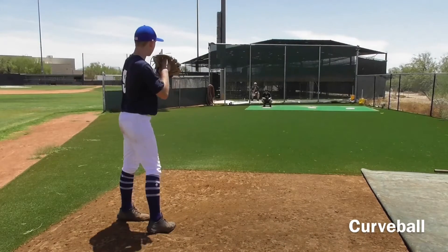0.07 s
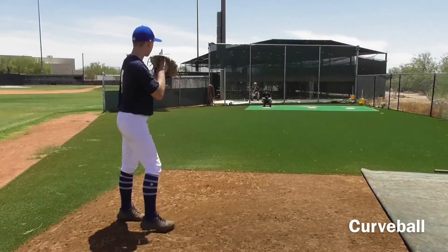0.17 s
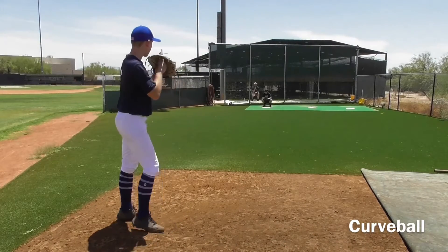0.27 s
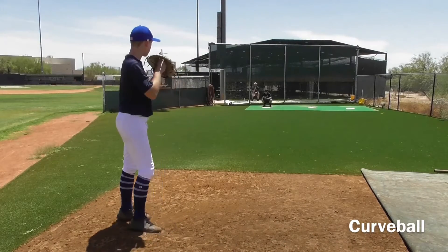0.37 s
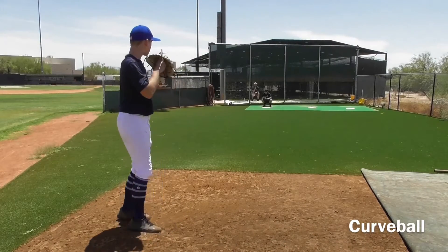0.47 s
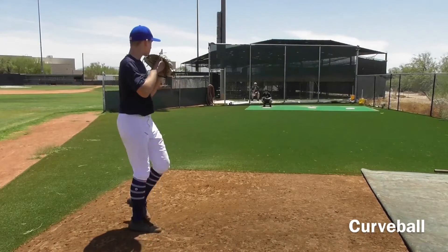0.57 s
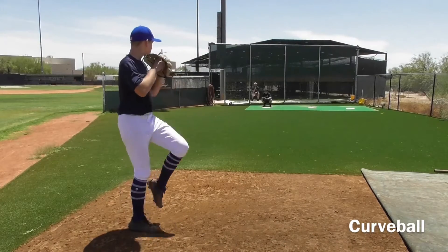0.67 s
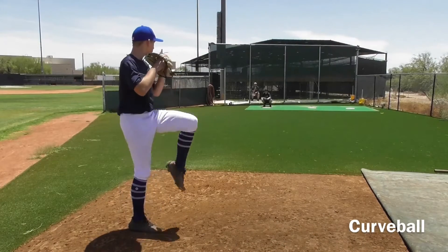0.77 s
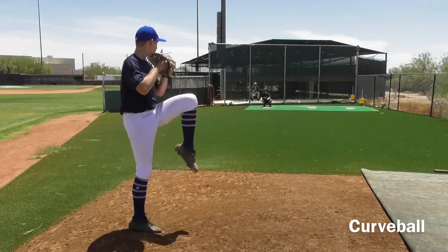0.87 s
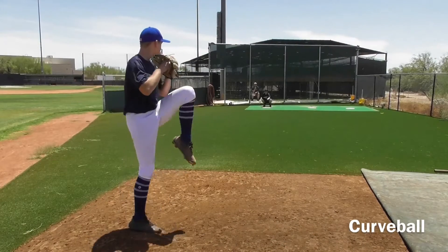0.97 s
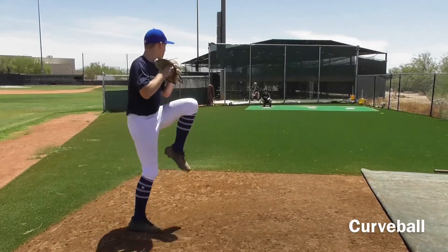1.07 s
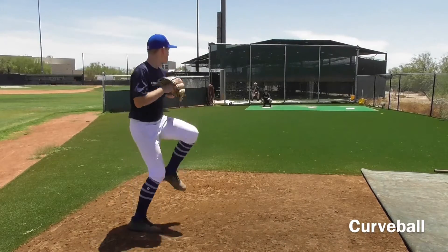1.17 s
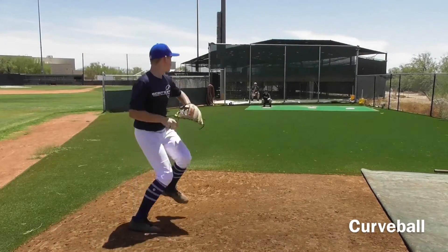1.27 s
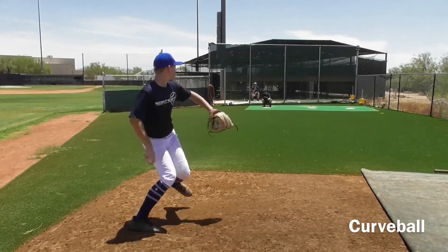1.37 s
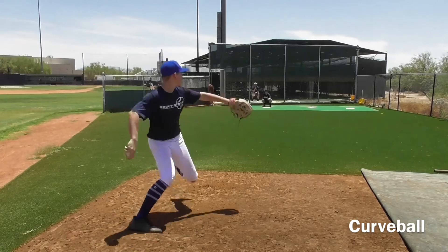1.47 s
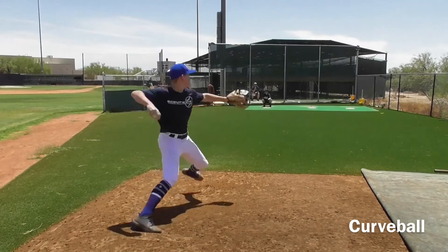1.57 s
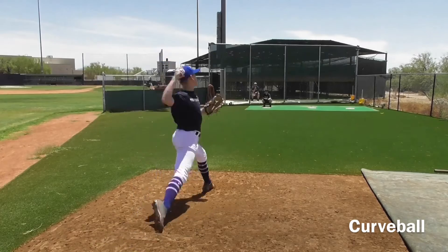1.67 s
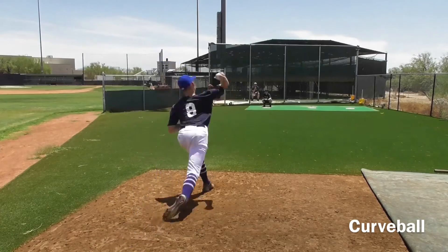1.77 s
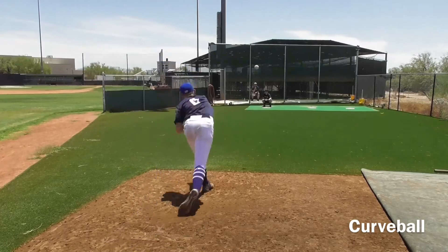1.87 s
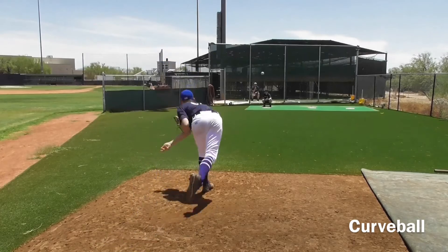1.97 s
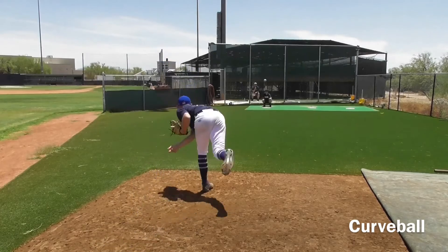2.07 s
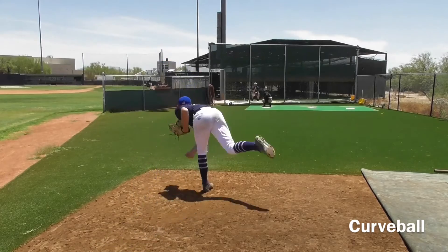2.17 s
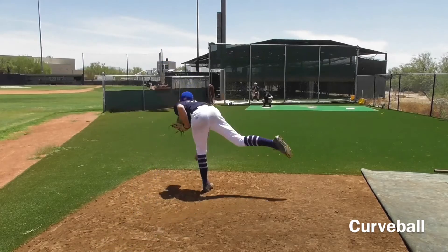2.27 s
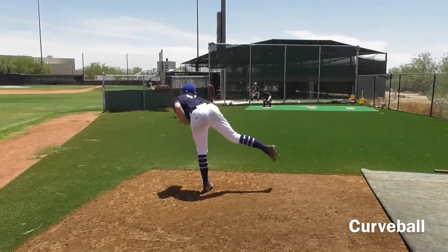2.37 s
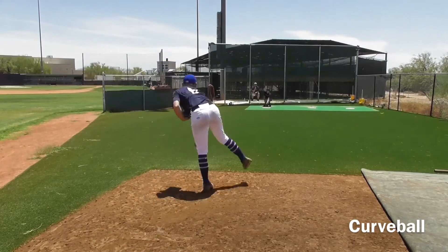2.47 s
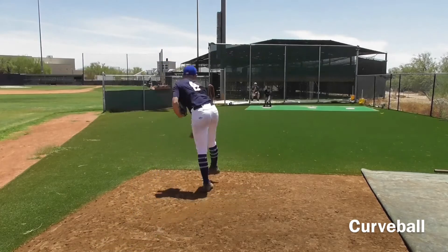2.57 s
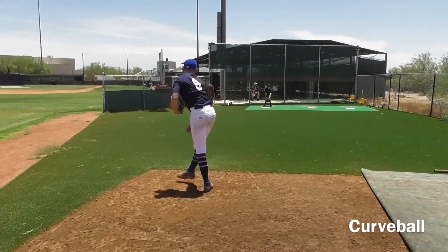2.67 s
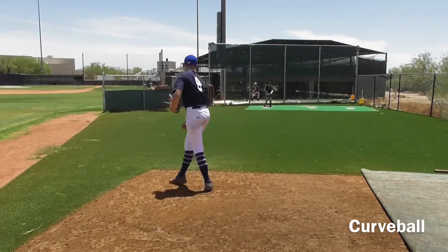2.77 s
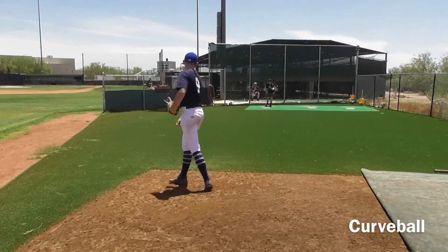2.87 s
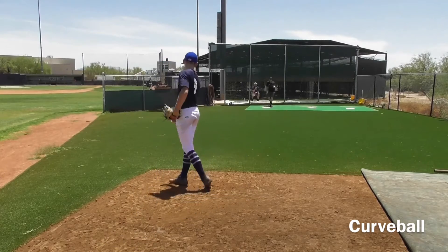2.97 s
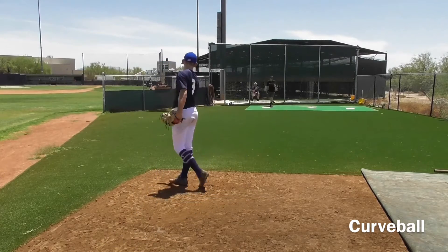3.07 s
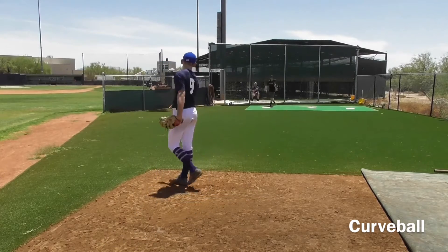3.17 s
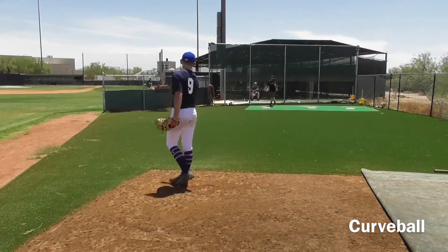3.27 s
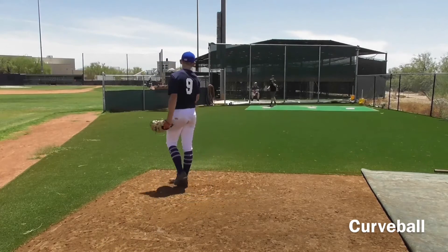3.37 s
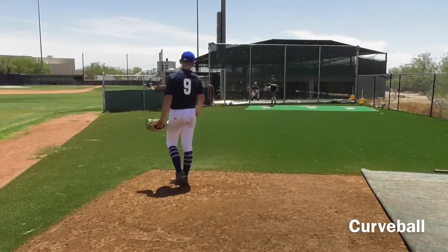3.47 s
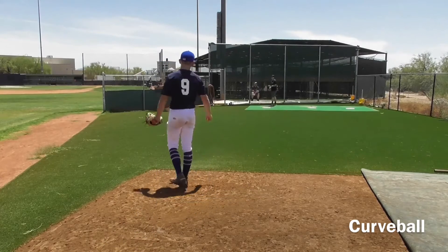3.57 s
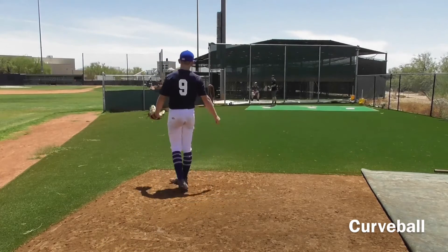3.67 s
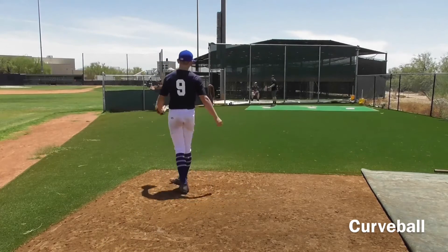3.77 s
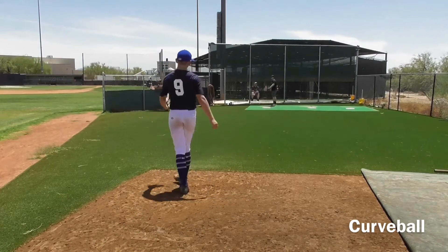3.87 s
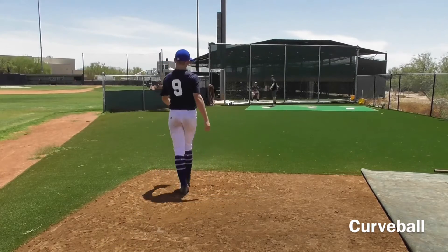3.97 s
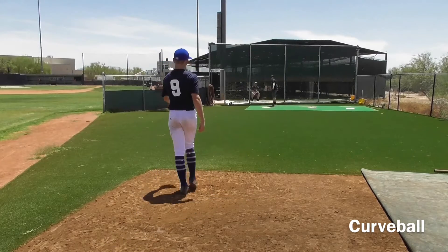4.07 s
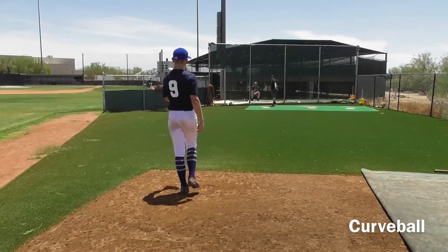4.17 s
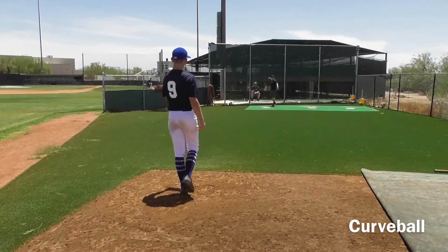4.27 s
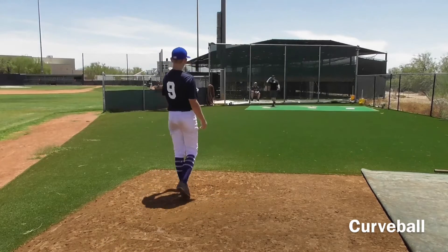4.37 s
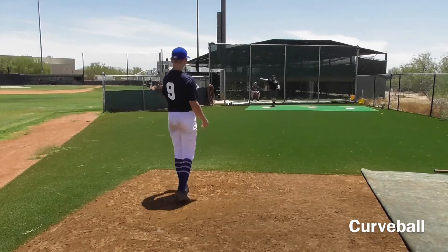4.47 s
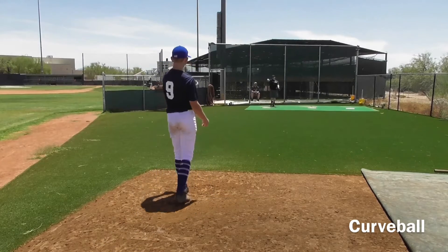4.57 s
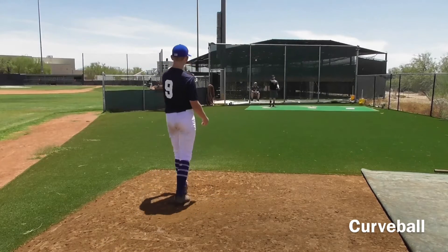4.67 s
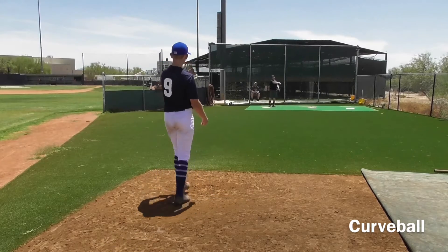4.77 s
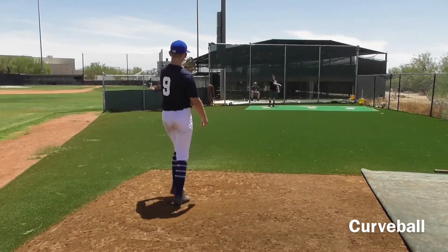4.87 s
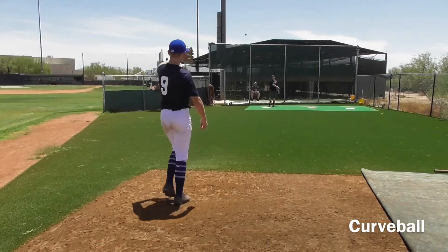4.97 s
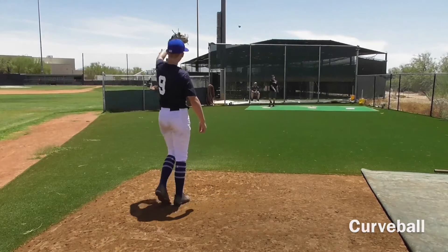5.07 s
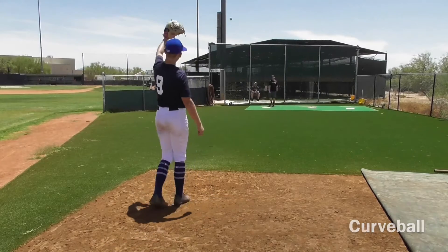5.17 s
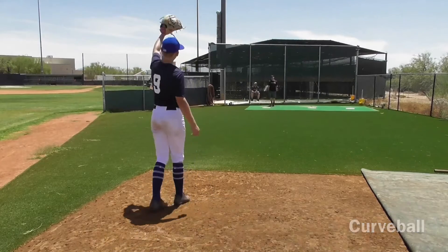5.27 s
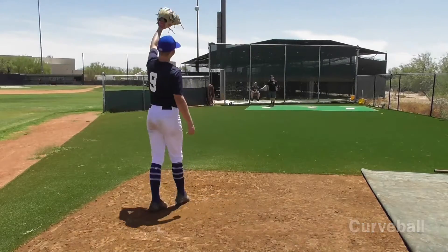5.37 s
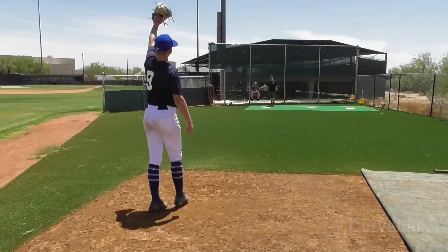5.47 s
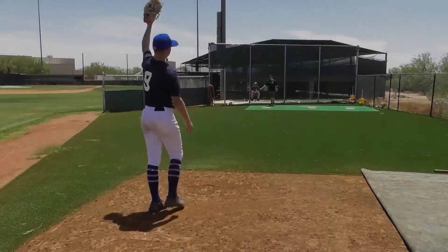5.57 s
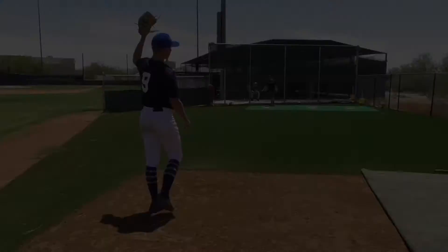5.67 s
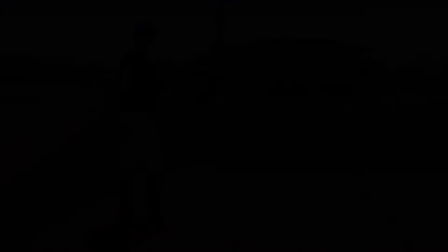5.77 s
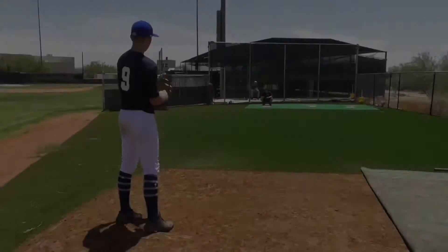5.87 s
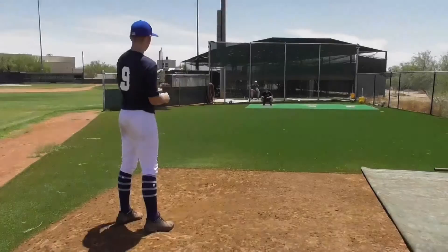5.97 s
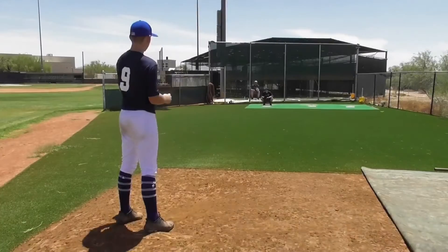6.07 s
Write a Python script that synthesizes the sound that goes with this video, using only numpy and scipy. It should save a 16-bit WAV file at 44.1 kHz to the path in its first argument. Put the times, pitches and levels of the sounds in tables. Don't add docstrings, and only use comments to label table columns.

```python
import sys
import numpy as np
from scipy import signal
from scipy.fft import rfft, irfft, next_fast_len
from scipy.io import wavfile
from scipy.ndimage import uniform_filter1d, minimum_filter1d

SR = 44100
rng = np.random.default_rng(int(sys.argv[2]) if len(sys.argv) > 2 else 0)


def attenuation_scalar(level_db):
    decades = np.asarray(level_db, float) / 20
    return 10 ** decades


def digitize_waveform(pressure):
    field = np.atleast_2d(pressure).T
    bounded = np.clip(field, -1, 1)
    quanta = np.round(bounded * 32767).astype(np.int16)
    wavfile.write(sys.argv[1], SR, quanta)


N = 269627
TIME, PADDED = np.arange(N) / SR, next_fast_len(N)
FREQ = np.maximum(np.fft.rfftfreq(PADDED, 1 / SR), 1)


def unit(x):
    return x / np.sqrt(np.mean(x ** 2))


def noise():
    return rng.standard_normal(N)


def curve(table, column):
    rows = np.array(table)
    return np.interp(TIME, rows[:, 0], rows[:, column])


def colour(table):
    rows = np.array(table)
    return attenuation_scalar(np.interp(np.log(FREQ), np.log(rows[:, 0]), rows[:, 1]))


def bell(hz, octaves):
    return np.exp(-(np.log2(FREQ / hz) / octaves) ** 2)


def shaped(x, gain):
    return irfft(rfft(x, PADDED) * gain, PADDED)[..., :N]


def band(x, hz, octaves):
    return shaped(x, bell(hz, octaves))


def walk(rate):
    hold = int(SR / rate)
    steps = np.repeat(rng.standard_normal(N // hold + 1), hold)
    return unit(uniform_filter1d(uniform_filter1d(steps, hold), hold)[:N])


def even(x, seconds):
    size = int(seconds * SR)
    return x / np.sqrt(uniform_filter1d(uniform_filter1d(x ** 2, size), size))


def pair(mid, side):
    return np.array([mid + side, mid - side])


def add(out, s, sound):
    i = int(s * SR)
    out[..., i:i + sound.shape[-1]] += sound[..., :N - i]


# (frequency [Hz], level [dB per Hz])
AIR_COLOUR = [(12, -41.5), (24, -8.5), (98, -5), (134, -9), (168, -6.5), (270, -12), (377, -13),
              (410, -17.5), (527, -21), (802, -21), (1660, -39.5), (3630, -42), (5080, -53), (8650, -43),
              (16000, -46)]
# (frequency [Hz], side minus mid [dB])
AIR_WIDTH = [(60, -7), (110, -8.5), (200, -13), (380, -11), (700, -11), (1290, -12.5), (2380, -20.5),
             (4400, -24.5), (8120, -16.5), (15000, 3.5)]
# (time [s], level [dB])
TRAFFIC = [(0, -49), (.5, -49.5), (1.05, -46.5), (1.4, -48.5), (2.3, -49), (2.8, -46), (3.4, -48.5),
           (3.92, -47.5), (4.1, -50.5), (4.7, -49), (5.2, -48.5), (5.8, -49.5)]


def field():
    mid, side = (rfft(noise(), PADDED) * colour(AIR_COLOUR) for _ in range(2))
    side = side * colour(AIR_WIDTH)
    layers, swell = np.zeros((4, 2, N)), walk(1.443)
    for hz in 22 * 2 ** np.arange(0, 9.6, .5):
        gain = bell(hz, .5)
        flicker_db = 0.59 * swell + 2.18 * min(1, (600 / hz) ** .5) * walk(9)
        layer = np.searchsorted([150, 1500, 5000], hz)
        layers[layer] += attenuation_scalar(flicker_db) * pair(irfft(mid * gain, PADDED)[:N], irfft(side * gain, PADDED)[:N])
    echo_s, echo_db, echo_ms = 2.535, -38, 42
    echo = attenuation_scalar(echo_db) * (TIME > echo_s) * np.exp(-np.abs(TIME - echo_s) * 1000 / echo_ms)
    traffic = np.hypot(attenuation_scalar(curve(TRAFFIC, 1)), echo)
    breeze = attenuation_scalar(-50.5 + 10 * np.exp(-TIME / .35))
    air = attenuation_scalar(-74.3) * (traffic / attenuation_scalar(-49)) ** .45 + echo * attenuation_scalar(-27)
    levels = [breeze, traffic, air, attenuation_scalar(-71)]
    return sum(gain * x / x.mean(axis=0).std() for gain, x in zip(levels, layers))


# (time [s], depth [dB], half length [s])
HUM_LULLS = [
    (.35, -18, .2),
    (.85, -12, .2),
    (2.59, -25, .025),
    (3.3, -18, .07),
    (4.0, -22, .1),
    (5.17, -25, .09),
]


def hum():
    level_db = -49.5 + sum(db * np.exp(-((TIME - s) / half) ** 2) for s, db, half in HUM_LULLS)
    level = np.sqrt(2) * attenuation_scalar(level_db + 1.2 * walk(14) - 1.5)
    pitch_hz = 166.7 + 2.0 * walk(5.5)
    return level * np.sin(2 * np.pi * np.cumsum(pitch_hz) / SR)


def insects():
    swell = np.exp(-((TIME - 3.2) / .17) ** 2)
    return swell * attenuation_scalar(-76 + 2.0 * walk(24.9)) * unit(band(noise(), 3550, 0.11))


# (time [s], peak level [dB], pitch [Hz], length [ms])
AIR_PUFFS = [
    (0.06, -38, 140, 20),
    (0.088, -32, 79.5, 17),
    (0.24, -31, 57.6, 9.4),
    (1.029, -40, 59.2, 13),
    (1.297, -34, 72.7, 14.0),
    (1.392, -31, 63, 17.5),
]


def puffs():
    out, ms = np.zeros((2, N)), np.arange(4096) / SR * 1000
    for s, db, hz, length in AIR_PUFFS:
        shape = np.exp(-(ms / length - 1.3) ** 2) * np.sin(2 * np.pi * hz * ms / 1000)
        add(out, s, attenuation_scalar(db) * shape * np.array([[.8], [1.2]]))
    return out


# (time [s], common level [dB], opposed minus common level [dB])
GUST_PATH = [
    (5.83, -45, 2.5),
    (5.84, -44, 2.5),
    (5.894, -25, 2),
    (5.986, -23, 2),
    (6.114, -26, 3),
]
# (frequency [Hz], level [dB per Hz])
GUST_COMMON = [(15, -49), (25, -23), (140, 0), (200, 1), (300, -1), (543, -12), (732, -17.5), (1120, -23),
               (2730, -63), (4000, -63.5), (5200, -94.5), (8800, -120)]
# (frequency [Hz], level [dB per Hz])
GUST_OPPOSED = [(15, -73), (25, -32), (118, -12.5), (155, -6.5), (341, -4), (412, -2), (985, -14.5),
                (1380, -30), (2670, -58), (4000, -69), (5200, -99), (8800, -120)]
# (time [s], peak level [dB])
GUST_BUFFETS = [(5.87, -42), (5.888, -22.5), (5.899, -34), (5.916, -36), (5.936, -31), (5.947, -24),
                (5.965, -19), (5.98, -30.5), (6.006, -28), (6.032, -30.5), (6.043, -28), (6.061, -25),
                (6.084, -30), (6.099, -31.5)]


def buffets():
    hard, slaps, ms = np.zeros(N), np.zeros(N), np.arange(2048) / SR * 1000
    swings_hz = 480 * np.exp(.15 * rng.standard_normal(len(GUST_BUFFETS)))
    for (s, db), hz in zip(GUST_BUFFETS, swings_hz):
        shape = attenuation_scalar(db) * np.exp(-(ms / 2.9 - 1.2) ** 2 * 2)
        add(hard, s, shape)
        add(slaps, s, shape * np.sin(2 * np.pi * hz * ms / 1000))
    eddies = [hard * unit(band(noise(), 870, 0.72)) for _ in range(2)]
    return pair(.35 * slaps + attenuation_scalar(-15) * eddies[0], attenuation_scalar(6.5) * slaps + attenuation_scalar(-4) * eddies[1])


def gust():
    flutter, dull = attenuation_scalar(1.1 * walk(70)), 1 / (1 + (FREQ / 1500) ** 2)
    mid, side = (even(shaped(flutter * noise(), colour(table) * dull), 0.015)
                 for table in (GUST_COMMON, GUST_OPPOSED))
    start = np.clip((TIME - GUST_PATH[0][0]) / 0.0025, 0, 1)
    strength_db = curve(GUST_PATH, 1)
    wind = start * attenuation_scalar(strength_db) * pair(mid, attenuation_scalar(curve(GUST_PATH, 2)) * side)
    edge = shaped(wind, 1 / (1 + (650 / FREQ) ** 4))
    wind = wind + edge * (attenuation_scalar(.5 * (strength_db + 25)) - 1)
    return (wind + buffets()) * attenuation_scalar([[-.7], [.7]])


# (time of hardest pressure [s], grit level [dB], lean-in [ms], let-go [ms],
# drag minus grit [dB])
CLEAT_SLIDES = [(1.19, -69, 45, 110, 12), (1.566, -72, 140, 60, 3.5), (1.695, -56, 16, 28, 6),
                (1.738, -46, 10, 12, 3.5), (1.757, -50, 12, 3.5, 2.5), (1.79, -65, 25, 40, 5),
                (1.843, -54, 8, 34, 5.5), (1.915, -68, 30, 170, 7), (2.262, -68, 35, 35, -5),
                (2.35, -75, 60, 90, -2), (3.67, -76, 70, 90, 4), (5.2, -74, 80, 120, 6),
                (5.618, -70, 60, 70, 3.5)]


def dirt():
    grains = noise() * attenuation_scalar(3.04 * rng.exponential(size=N)) * attenuation_scalar(2.4 * walk(200))
    grit = unit(band(grains, 8000, 0.62))
    scrape = unit(band(grains, 2620, 0.79))
    drag = unit(band(grains, 630, 0.84))
    out = np.zeros(N)
    for s, db, lean, let_go, drag_db in CLEAT_SLIDES:
        pressure = np.exp(-np.abs(TIME - s) * 1000 / np.where(TIME < s, lean, let_go))
        scrape_db = -3 - .25 * (db + 60)
        out += attenuation_scalar(db) * pressure * (grit + attenuation_scalar(scrape_db) * scrape + attenuation_scalar(drag_db) * drag)
    return out


# (time [s], peak level [dB], treble minus middle [dB])
LEATHER_CRACKS = [(2.5133, -40, -1), (2.5182, -32.5, -9), (2.526, -28.5, -4), (2.531, -38, -9),
                  (2.5368, -34.5, -8), (2.5424, -44, -7), (2.566, -50, -6), (2.5774, -48, -9),
                  (5.5007, -19, -10.5), (5.5052, -14.5, -11.5), (5.5204, -46, 4)]
# (time [s], peak level [dB], body minus middle [dB], treble minus middle [dB])
DIRT_TICKS = [(0.1615, -52, -3, -15), (0.3267, -47, 12, -8), (0.5232, -55.5, 4, -13), (0.5826, -52, 0, -10),
              (0.6166, -50, -2, -13), (0.9194, -50, -10, -9), (1.1842, -37.5, 0, -2), (1.7484, -45, 8, -1),
              (1.757, -48, 7, 3), (1.8390, -41.5, 6, 4), (1.8541, -45, 0.5, 7), (1.8735, -42.5, 4, -7),
              (2.2227, -53, 6, 2), (2.7734, -46, 14, -9), (3.6496, -52.5, 5, -5), (4.5865, -53, -2, 1),
              (5.16, -52, 7, -4), (5.6555, -46, 0, -9)]


def snaps():
    body, middle, treble = (unit(band(noise(), hz, octaves))
                            for hz, octaves in [(750, 0.89), (2900, 0.8), (8600, .5)])
    low, mid, high = np.zeros((3, N))
    ms = np.arange(8192) / SR * 1000
    tail = attenuation_scalar(-24.5) * np.exp(-ms / 32.5)
    crack = np.minimum(ms / 0.36, 1) * np.exp(-ms / 3.4)
    bright_crack = crack + attenuation_scalar(-7.5) * tail
    for s, db, treble_db in LEATHER_CRACKS:
        add(low, s, attenuation_scalar(db - 3.5) * (0.14 * crack + tail))
        add(mid, s, attenuation_scalar(db - 12.5) * bright_crack)
        add(high, s, attenuation_scalar(db + treble_db - 10.5) * bright_crack)
    tick = np.minimum(ms / 1.1, 1) * np.exp(-ms / 3.2)
    for s, db, body_db, treble_db in DIRT_TICKS:
        add(low, s, attenuation_scalar(db + body_db - 5) * tick)
        add(mid, s, attenuation_scalar(db - 9) * tick)
        add(high, s, attenuation_scalar(db + treble_db - 7.5) * tick)
    return low * body + mid * middle + high * treble


# (time [s], peak level [dB], pocket pitch [Hz], ring [cycles])
MITT_BLOWS = [
    (2.5125, -23, 300, 1.0),
    (2.518, -16, 640, .45),
    (2.5208, -18, 420, .7),
    (2.5280, -5, 420, .4),
    (2.5268, -18, 285, 1.1),
    (2.5265, -30, 1250, 1.8),
    (2.535, -25, 430, 2.6),
]
# (time [s], peak level [dB], pocket pitch [Hz], ring [cycles])
GLOVE_BLOWS = [
    (5.5027, -19, 700, 1.5),
    (5.5062, -13.5, 1130, 2.2),
    (5.5061, -26, 3600, 3.2),
    (5.5067, -7.2, 470, 1.1),
    (5.5072, -19, 300, 1.5),
    (5.5124, -11, 406, 1.1),
    (5.5182, -16, 380, .6),
]
# (time [s], peak level [dB], hollow pitch [Hz], ring [cycles])
HEEL_KNOCKS = [
    (.592, -32, 550, 1.3),
    (1.1845, -44, 2110, 4.8),
    (1.19, -36, 400, 1.5),
    (1.688, -27.5, 640, 1.2),
    (1.69, -36, 300, 2.5),
    (2.7745, -50, 2260, 8),
]


def leather():
    out, t = np.zeros(N), np.arange(2048) / SR
    for rows, squeeze in [(MITT_BLOWS, 1.03), (GLOVE_BLOWS, .38), (HEEL_KNOCKS, .45)]:
        for s, db, hz, ring in rows:
            cycles = hz * t
            push = np.minimum(cycles / squeeze, 1) ** 2
            decay = np.exp(-np.maximum(cycles - squeeze, 0) / ring)
            add(out, s, attenuation_scalar(db) * push * decay * np.sin(2 * np.pi * cycles))
    return signal.sosfiltfilt(signal.butter(2, 100, "high", fs=SR, output="sos"), out)


def fade():
    change_s, fall_ms, rise_ms = 5.832, 27, 28
    away = np.abs(TIME - change_s) * 1000 / np.where(TIME < change_s, fall_ms, rise_ms)
    return attenuation_scalar(-23 * np.maximum(1 - away, 0))


# (time [s], left minus right level [dB])
PAN = [
    (0, .5),
    (1.5, 1),
    (2.4, -0.5),
    (2.7, 1.5),
    (5.4, 1.5),
    (6.1, 9),
]


def scene():
    near = leather() + snaps() + dirt()
    wide = attenuation_scalar(-15.5) * band(np.roll(near, 12), 1200, 1.7)
    wide += attenuation_scalar(-18) * band(np.roll(near, 40), 7700, 1.5)
    pan_db = curve(PAN, 1) * np.array([[.5], [-.5]])
    background = field() + hum() + puffs() + insects()
    return (pair(near, wide) * attenuation_scalar(pan_db) + background) * fade() + gust()


def starve(x):
    z = signal.stft(np.pad(x, ((0, 0), (0, 4096)), "reflect"), nperseg=1024)[2]
    power = (np.abs(z) ** 2).mean(axis=0)
    total = minimum_filter1d(power.sum(axis=0), size=5)
    blocks = uniform_filter1d(power[:-1].reshape(64, 8, -1).sum(axis=1), size=3, axis=1)
    scatter = 2 * uniform_filter1d(rng.standard_normal(blocks.shape), size=4, axis=1)
    top = np.clip(np.linspace(-2, 2.4, 64), 0, 1)[:, None]
    need_db = -67 + 8 * top + 3.2 * scatter
    z[:, :-1] *= np.repeat(blocks > total * attenuation_scalar(2 * need_db), 8, axis=0)
    return signal.istft(z, nperseg=1024)[1][:, :N]


# (frequency [Hz], width [octaves], level [dB])
HOUSING_MODES = [
    (2020, 0.14, 3.5),
    (2895, 0.2, -4),
    (3850, 0.1, 0.5),
    (5040, 0.11, -4),
    (8090, .13, 3),
]


def housing(x):
    colour_db = sum(db * bell(hz, octaves) for hz, octaves, db in HOUSING_MODES)
    return shaped(x, attenuation_scalar(colour_db) * (FREQ < 15780))


def roll_off(x):
    return signal.sosfilt(signal.butter(12, 16630, fs=SR, output="sos"), x)


def record(dry):
    mix = starve(housing(dry))
    return roll_off(mix)


dry = scene()
out = record(dry)
digitize_waveform(out)
```